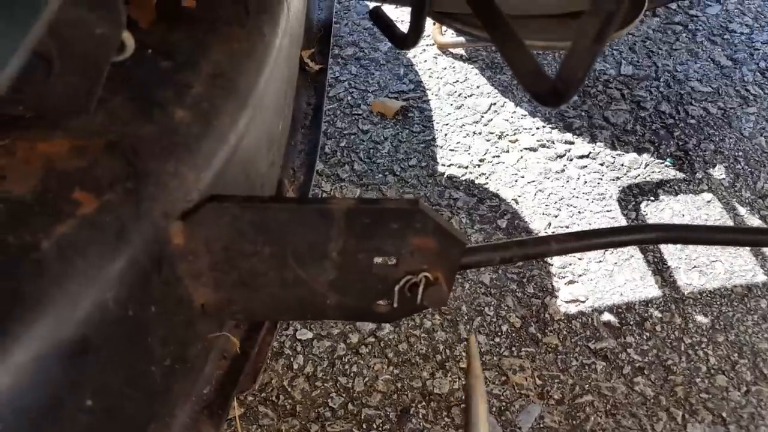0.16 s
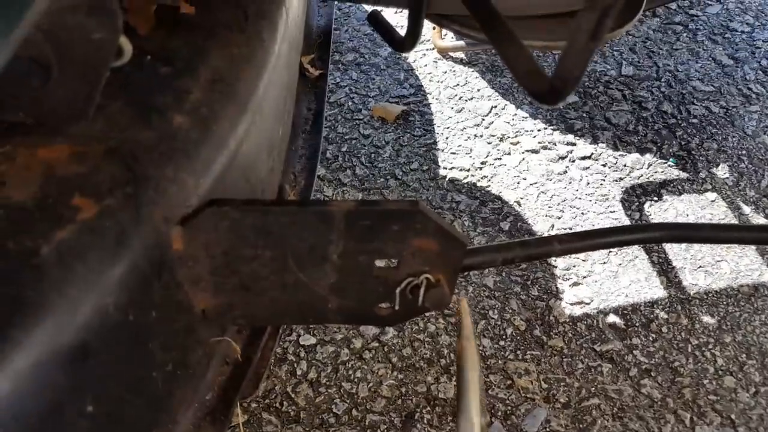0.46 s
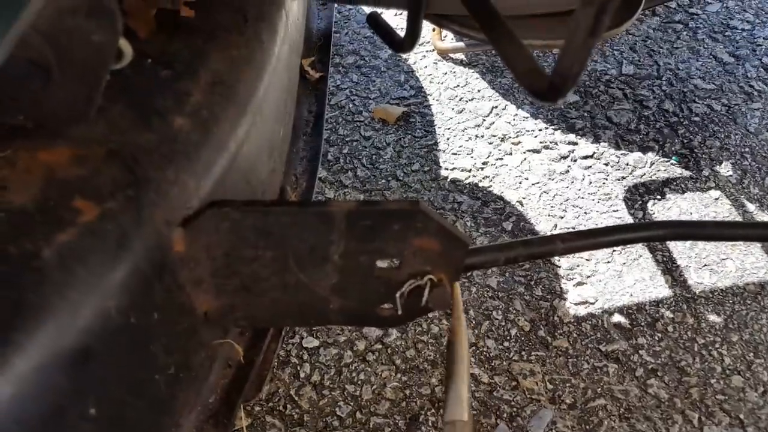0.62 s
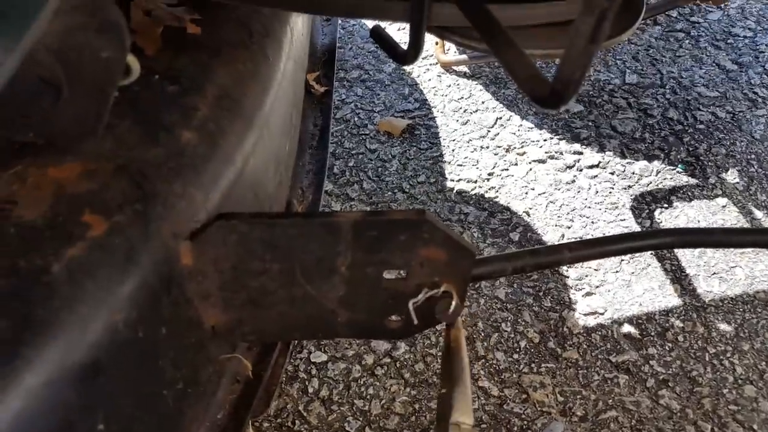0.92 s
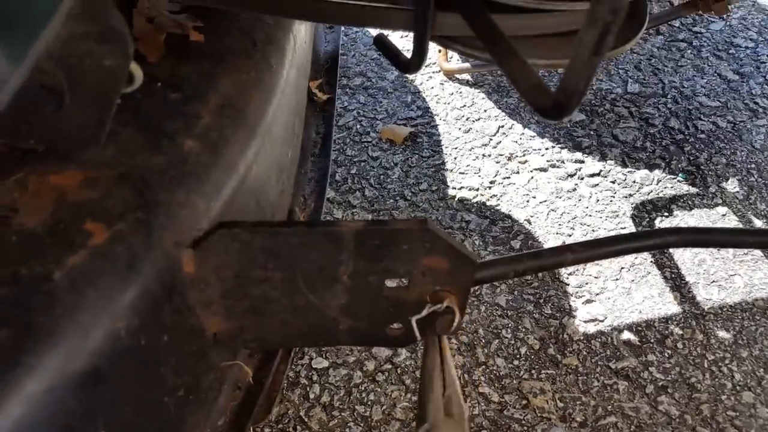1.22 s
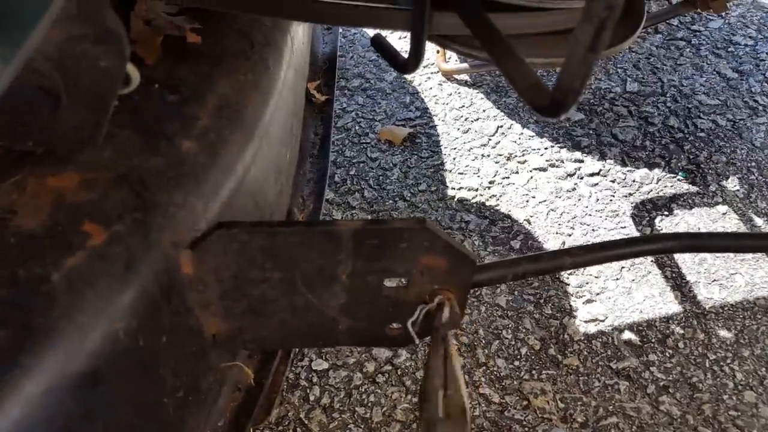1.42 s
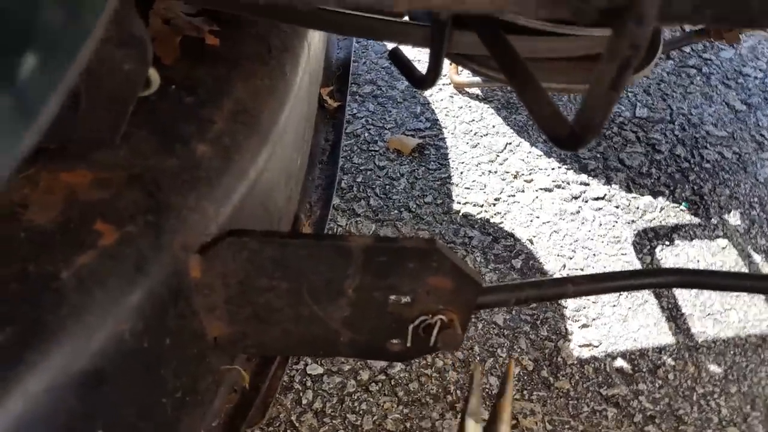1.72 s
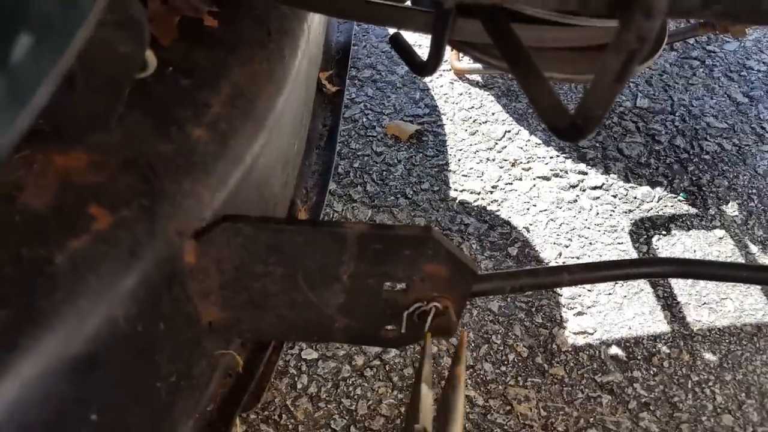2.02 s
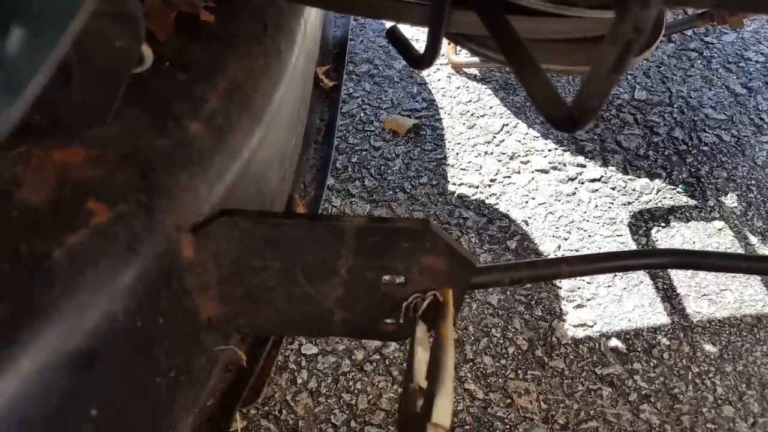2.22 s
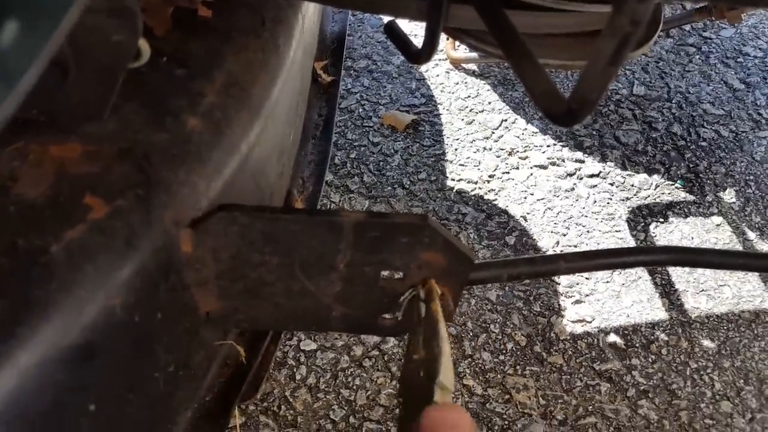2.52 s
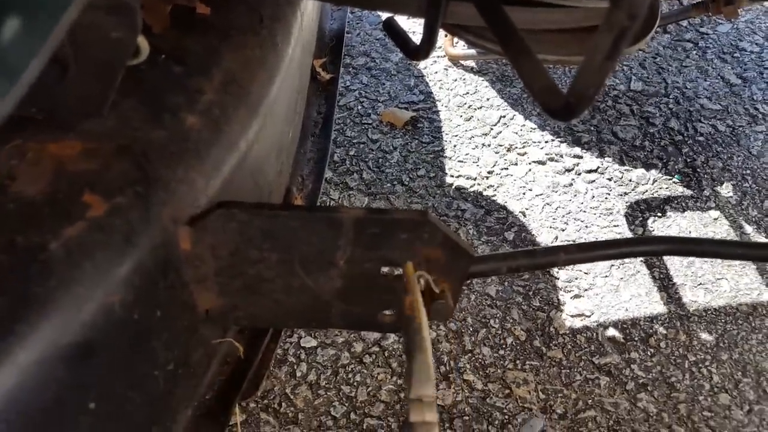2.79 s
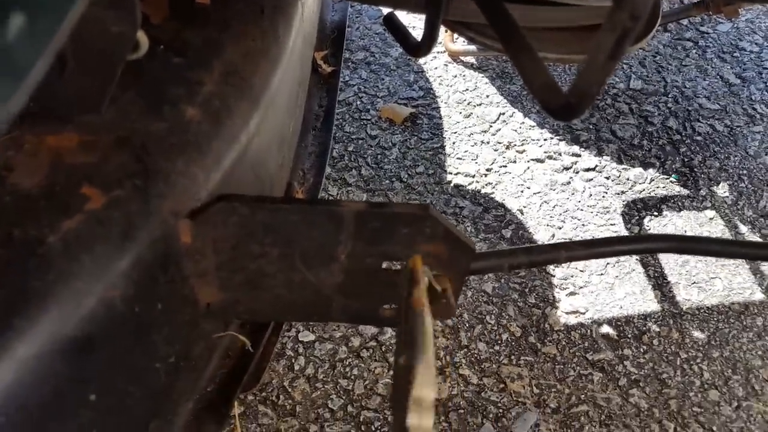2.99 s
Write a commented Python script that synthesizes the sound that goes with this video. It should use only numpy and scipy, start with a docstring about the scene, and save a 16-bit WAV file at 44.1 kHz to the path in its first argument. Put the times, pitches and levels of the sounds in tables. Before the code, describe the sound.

Needle-nose pliers click, scrape and knock on a wire clip in a steel bracket, close up.

```python
"""A distant engine's hum sinks outside an open garage while a small bird chirps; then close metal work begins.
Needle-nose pliers lever a wire clip in a steel bracket: each knock is a burst of noise bands and decaying sines.
Jaws and wire add light ticks, made the same way, and scrapes, made of dense grains of coloured noise.
The engine is a gliding stack of sines, the bird short fluttering tones, the air outside shaped noise."""
import sys
import numpy as np
from scipy import signal
from scipy.fft import rfft, irfft, next_fast_len
from scipy.io import wavfile

SR = 44100
rng = np.random.default_rng(int(sys.argv[2]) if len(sys.argv) > 2 else 0)


def generate_wav(sig):
    """Save sig (samples, or channels by samples) to the path in sys.argv[1] as 16-bit PCM at SR."""
    pcm = np.round(np.clip(np.atleast_2d(sig).T, -1, 1) * 32767).astype(np.int16)
    wavfile.write(sys.argv[1], SR, pcm)


N = 138915

BASS_HZ, BODY_HZ, BITE_HZ, TREBLE_HZ = 280, 856, 2470, 10100  # pitches that define a blow's colour
BANDS = 31.25 * 2 ** (np.arange(28) / 3)  # third-octave centres, Hz
RIGHT_LAG_S = 0.00016  # delay of common sound at the right microphone


def undb(db):
    """Decibels to gain."""
    return 10 ** (np.asarray(db) / 20)


def at(hz, table, axis=1):
    """Read one column of a table on a log-frequency axis."""
    table = np.array(table, float)
    return np.interp(np.log(np.maximum(hz, 1)), np.log(table[:, 0]), table[:, axis])


def fade(t, t60):
    """Exponential decay by 60 dB in t60 seconds."""
    return np.exp(-np.log(1000) * t / t60)


def pan(left_db):
    """Left and right gains of constant power, from the left's excess over the right in dB."""
    gains = undb(np.array([[left_db], [-left_db]]) / 2)
    return gains / np.sqrt(np.mean(gains ** 2))


def add(out, start, sound):
    """Mix a sound in at its start time in seconds."""
    i = max(int(start * SR), 0)
    out[:, i:i + sound.shape[1]] += sound[:, :max(N - i, 0)]


def contacts():
    """Knocks ring bracket and pliers, each grip favouring its own modes; light ticks ring the sheet and, of the
    clear modes, only the pliers'."""
    # knocks on the bracket: start_s, level_db, bass_db, bite_db and treble_db (against level_db), contact_s,
    # left_over_right_db, crack_db, favoured modes [(pitch_hz, level_db)];
    # crack and modes are against the blow's colour
    knocks = [(0.644,-33.5,-4.5,1.5,-13.5,0.0052,-2,-8,[(436,1.5),(781,-0.5),(2126,-5),(2374,-5),(2864,-9),(3435,0)]),
              (.665,-42.5,5.5,6,-21,0.02,-1,-3,[(1475,-3),(2500,-2),(2960,-2),(3510,-6)]),
              (.763,-39.5,4,-2,-12.5,0.0029,2.5,-3,[(6700,1)]),
              (0.8102,-38.5,-8,4,0.5,0.0031,-1,-1,[(781,2.5),(2121,-0.5),(2859,0.5),(3042,-2),(3440,-14)]),
              (.848,-46,-3,-6,-23,.011,-2,0,[(1470,-1),(3042,-9)]),
              (0.934,-34.5,-0.5,-3,-25.5,0.0011,0,3,[(441,2),(590,5),(711,-0.5),(1604,-1),(1841,2)]),
              (1.094,-28.5,-10,-18,-36,0.0051,-1.5,6,[(673,-5.5),(1023,-4.5),(1330,-2.5),(1642,-6)]),
              (1.533,-38.5,9,-0.5,-8,.0095,-1.5,-2,[(4304,0),(1855,-4),(8800,-14),(10352,-3)]),
              (1.553,-44.5,3,-2,-3.5,0.017,0,0,[(1093,7),(4350,-3)]),
              (2.296,-37,-4.5,-5,-9,.0064,0,14,[(678,1.5),(1174,-9),(3946,-2.5),(6605,-1.5),(8882,-8)]),
              (2.393,-25.5,-9.5,-4.5,-11.5,0.0011,-0.5,-13,[(1087,-3),(1860,-11),(2449,-8),(3951,-14),(7350,-4)]),
              (2.554,-17,-7,-3.5,-15,0.0026,-0.5,18.5,[(236,-3),(331,-3.5),(775,-5.5),(1114,-2.5),(1410,-2),(2159,-3.5)]),
              (2.621,-33,7,-4,-2,0.0015,-1.5,9,[(330,-1.5),(1017,0),(1863,0),(2970,6.5)]),
              (2.64,-40,-7,3,-22,.004,-1,3,[(2372,-8)]),
              (2.6846,-24.5,-7.5,-1,-4,0.0032,2.5,7,[(1174,-4),(1410,-7.5),(1841,-3),(3031,-5)]),
              (2.717,-25,1,-10,-24.5,.0032,-3,-4,[(6500,0),(8700,-5)]),
              (2.7648,-26.5,-2,7,-1.5,0.0018,0,12,[(2350,-6),(2885,-13.5),(8882,-5.5),(10508,-2)]),
              (2.771,-19,-10,-13,-13,0.0013,0.5,0,[(180,0),(262,2),(331,1),(598,-1),(711,-6)]),
              (2.794,-47,7.5,-24,-34,.0023,14,0,[(333,10),(366,2)]),
              (2.964,-35,0,-11.5,-34,0.0087,0,-6,[(5920,1)]),
              (2.9984,-24.5,-5,-3,-24,0.0038,-1.5,-2,[(1250,2),(1405,-6),(3870,-7),(2869,-4),(3034,-3)]),
              (3.025,-47.5,8,-22,-7,0.0049,2,0,[(1250,-9)]),
              (3.119,-38.5,-1,-8.5,-18.5,0.0077,0.5,-4,[(1900,2),(5650,-6)])]
    # light ticks of jaws on wire: start_s, level_db, left_over_right_db
    ticks = [(.6160, -43.5, -1), (0.7482, -46, -1), (1.6022, -42, -1.5), (1.6463, -51.5, 1),
             (2.167, -58.5, 1), (2.193, -68, 0), (2.228, -63, 3), (2.285, -49, 0), (2.448, -51.5, -1),
             (2.474, -53.5, 0), (2.547, -46, 0), (2.942, -49.5, 2), (3.065, -59, -2)]
    # modes of bracket and housing: pitch_hz, level_db, t60_s
    bracket = [(165.1, -15.5, 0.64), (246.7, -19, 0.057), (273.9, -10.5, 0.52), (327.9, -11.5, 0.37),
               (359.6, -14.5, 0.72), (597.5, -14, 0.41), (697, -19, 0.69), (745, -12, 0.34),
               (1087, -17, 0.18), (1153, -12.5, 0.22), (1375, -36, 0.42), (1814, -22.5, 0.51),
               (2240, -36.5, 0.55), (2383, -6, 0.1)]
    # modes of the pliers: pitch_hz, level_db, t60_s
    pliers = [(2780,-15.5,0.13),(3190,-53,0.091),(3670,-14,0.14),(6230,-4,.04),(8882,-21,0.12),(13100,-27,.05)]
    # colour of a tick, against its level: pitch_hz, level_db
    tick_colour = [(200, -27), (1200, -4.5), (3000, -6.5), (6500, -3), (14000, -10)]
    mode_scatter_db = 2.5
    grip_t60_s, grip_damping = 0.23, 0.4  # t60 at the body pitch; how fast it shortens upwards
    tick_contact_s, tick_crack_db = 0.0078, 6

    out = np.zeros((2, N))
    bands = band_noises()
    for start, db, bass, bite, treble, contact_s, left_db, crack_db, favoured in knocks:
        colour = [(BASS_HZ, db + bass), (BODY_HZ, db), (BITE_HZ, db + bite), (TREBLE_HZ, db + treble)]
        modes = [(hz, mode_db + mode_scatter_db * rng.standard_normal(), t60)
                 for hz, mode_db, t60 in bracket + pliers]
        modes += [(hz, mode_db, grip_t60_s * (BODY_HZ / hz) ** grip_damping) for hz, mode_db in favoured]
        modes += grip_modes()
        add(out, start, strike(bands, colour, contact_s, left_db, crack_db, modes))
    for start, db, left_db in ticks:
        colour = [(hz, db + tint) for hz, tint in tick_colour]
        add(out, start, strike(bands, colour, tick_contact_s, left_db, tick_crack_db, pliers))
    return out


def strike(bands, colour, contact_s, left_db, crack_db, modes):
    """One contact: a crack, the dense ring of the steel, its clear modes and the garage's tail."""
    # dense ring of the sheet metal: pitch_hz, level_db, t60_s, garage_tail_db, left_over_right_db
    sheet = [(74, -50, 0.21, 7, -13), (161.6, -2.5, 0.61, 1.5, 0.5), (402, -3, 0.35, -5.5, -1.5),
             (1000, -4, 0.14, -10, 1.5), (2100, -1.5, 0.14, -17, 6.5), (5400, -2.5, 0.057, -24, 3),
             (10500, 0.5, 0.031, -47, 3), (15200, -5.5, 0.042, -45, 0)]
    # reverberation of the garage: pitch_hz, t60_s
    garage = [(150, 0.63), (700, 0.73), (2500, 0.47), (6000, 0.11), (14000, 0.22)]
    crack_fall_s, room_build_s = 0.0013, 0.064  # time constants
    rise_cycles = 2.7  # time constant of the onset, in cycles of each pitch
    detune, phase_scatter = 0.003, 0.21  # share of pitch; cycles between the microphones

    t = np.arange(int(SR / 2)) / SR
    free = np.maximum(t - contact_s, 0)  # ring and tail decay only once the contact ends
    offset = rng.integers(N - len(t))  # a fresh stretch of noise for every strike
    out = np.zeros((2, len(t)))
    for hz, noise in zip(BANDS[2:], bands[2:]):
        ring = fade(free, at(hz, sheet, axis=2))
        crack = undb(crack_db) * np.exp(-t / crack_fall_s) * np.sqrt(hz / TREBLE_HZ)
        tail = undb(at(hz, sheet, axis=3)) * fade(free, at(hz, garage))
        tail = tail * (1 - np.exp(-t / room_build_s))
        rise = 1 - np.exp(-t * hz / rise_cycles)
        envelope = np.sqrt(ring ** 2 + crack ** 2 + tail ** 2) * rise
        sides = pan(left_db * min(hz / BODY_HZ, 1) + at(hz, sheet, axis=4))
        gain = undb(at(hz, colour) + at(hz, sheet))
        out += gain * sides * envelope * noise[:, offset:offset + len(t)]
    for hz, db, t60 in modes:
        pitch_chance, phase_chance, lag_chance, side_chance = rng.standard_normal(4)
        ringing = t[:int(t60 * SR)]
        treble_share = min(hz / BODY_HZ, 1)  # low pitches differ less between the sides
        lag = hz * RIGHT_LAG_S + phase_scatter * treble_share * lag_chance
        cycles = hz * (1 + detune * pitch_chance) * ringing + phase_chance - np.array([[0], [lag]])
        tone = np.sin((2 * np.pi * cycles).astype(np.float32))
        sides = pan(left_db * treble_share + at(hz, sheet, axis=4) + side_chance)
        envelope = fade(free[:len(ringing)], t60) * (1 - np.exp(-ringing * hz / rise_cycles))
        out[:, :len(ringing)] += undb(db + at(hz, colour)) * sides * tone * envelope
    end_fade = np.minimum(1, 10 * (t[-1] - t))
    return out * chatter(t) * end_fade


def grip_modes():
    """Many weak, sharp modes that shift with every new grip; the higher, the shorter."""
    count, level_db, scatter_db = 70, -18.5, 1.5
    t60_s, damping = 0.34, 0.71  # t60 at the body pitch; how fast it shortens upwards
    hz = np.geomspace(600, 15000, count) * (1 + 0.03 * rng.standard_normal(count))
    db = level_db + scatter_db * rng.standard_normal(count) + gap_db(hz)
    return list(zip(hz, db, t60_s * (BODY_HZ / hz) ** damping))


def gap_db(f):
    """Level of the steel's ring over pitch: it is mostly weaker in the gaps between its mode groups."""
    # gaps between the groups of sheet-metal modes: centre_hz, width_hz, level_db
    gaps = [(223, 29, -6), (600, 29, 0.5), (883, 150, -3), (1660, 70, -6.5), (2640, 84, -2.5),
            (4550, 250, -2.5)]
    return sum(db * np.exp(-((f - hz) / width) ** 2 / 2) for hz, width, db in gaps)


def band_noises():
    """Third-octave stereo noises of equal power, then shaped by the gaps between the mode groups."""
    f, spectrum = noise_spectrum()
    gap_gain = undb(gap_db(f))
    noises = []
    for hz in BANDS:
        mask = np.abs(np.log2((f + 1) / hz)) < 1 / 6
        noise = irfft(spectrum * gap_gain * mask)[:, :N]
        noises.append(noise / np.sqrt(mask.mean()) / 2)
    return noises


def noise_spectrum():
    """Stereo noise: alike in the bass, partly alike above, the common part a little late on the right."""
    shared, bass_shared, split_hz = 0.21, 0.98, 480  # shares common to both microphones
    size = 2 * next_fast_len(N // 2 + 1, real=True)
    f = np.fft.rfftfreq(size, 1 / SR)
    left, right, middle = rfft(rng.standard_normal((3, size)))
    share = np.clip(shared + (bass_shared - shared) / (1 + (f / split_hz) ** 2), 0, 1)
    common = middle * np.array([np.ones(len(f)), np.exp(-2j * np.pi * f * RIGHT_LAG_S)])
    return f, np.sqrt(share) * common + np.sqrt(1 - share) * np.array([left, right])


def coloured(table, per_octave=False):
    """Stereo noise of unit level whose colour is given per Hz, or per octave above 300 Hz."""
    f, spectrum = noise_spectrum()
    tilt = np.sqrt(np.maximum(f, 300)) if per_octave else 1
    noise = irfft(spectrum * undb(at(f, table)) / tilt)[:, :N]
    return noise / noise.std()


def chatter(t):
    """A quick uneven gain that settles: the judder of jaws, the flutter of a chirp."""
    depth_db, steps_per_s, settle_s = 3, 600, 0.02
    steps = rng.standard_normal(int(t[-1] * steps_per_s) + 2)
    wobble = np.interp(t * steps_per_s, np.arange(len(steps)), steps)
    return undb(depth_db * np.exp(-t / settle_s) * wobble)


def scrapes():
    """Serrated jaws catch and slip on the wire: dense uneven grains under a swell of pressure."""
    # jaws sliding on wire: start_s, length_s, level_db, brightness_db (gain above the split)
    slides = [(0.658, 0.15, -47, -19), (0.916, 0.061, -55, -0.5), (1.328, 0.12, -58.5, 3.5),
              (1.482, 0.13, -53.5, 2), (1.58, 0.1, -55, -3), (2.57, 0.05, -47, -4),
              (2.741, .04, -45.5, 4.5), (2.952, 0.1, -56, 6), (3.036, 0.12, -59, -1)]
    # colour of the rub: pitch_hz, level_db (per octave above 300 Hz)
    rub_colour = [(300, -34), (1200, 12.5), (3000, 12), (6000, 5), (10000, 6.5), (15000, 2)]
    grains_per_s, grain_scatter_db, grain_fall_s = 2400, 3, 0.002
    split_hz = 6500

    t = np.arange(N) / SR
    catches = (rng.random(N) < grains_per_s / SR) * undb(grain_scatter_db * rng.standard_normal(N))
    grains = signal.lfilter([1], [1, -np.exp(-1 / (grain_fall_s * SR))], catches)
    rub = grains / np.sqrt(np.mean(grains ** 2)) * coloured(rub_colour, per_octave=True)
    dull = signal.sosfiltfilt(signal.butter(2, split_hz, fs=SR, output="sos"), rub)
    bright = rub - dull
    out = np.zeros((2, N))
    for start, length, db, bright_db in slides:
        progress = np.clip((t - start) / length, 0, 1)
        pressure = np.sqrt(np.abs(np.sin(np.pi * progress)))
        out += undb(db) * pressure * (dull + undb(bright_db) * bright)
    return out


def engine():
    """A far engine's hum sinks as it slows: overtones of one falling pitch, wavering slightly."""
    # slowing of the engine: time_s, pitch_hz, level_db
    slowing = [(0.0, 103.1, -37.5), (0.11, 101.1, -44), (0.38, 101.2, -39.5), (0.46, 99.4, -46),
               (0.58, 94.4, -44), (0.69, 80.5, -59), (0.82, 74.1, -47), (1.06, 74.2, -52),
               (1.442, 67.1, -47), (1.68, 68.5, -46), (1.9, 58.08, -49.5), (2.3, 52.1, -53),
               (2.5, 48.9, -50), (2.6, 50.4, -69)]
    # its overtones, against the level above: multiple, level_db
    orders = [(1, 0.5), (1.5, -25), (2, -22), (3, -31), (4, -25.5)]
    pitch_waver, level_waver_db = 0.0028, 1.9
    t = np.arange(N) / SR
    times, hz, db = np.array(slowing).T

    def waver():
        return np.interp(t, np.linspace(0, t[-1], 70), rng.standard_normal(70))

    pitch = np.interp(t, times, hz) * (1 + pitch_waver * waver())
    phase = 2 * np.pi * np.cumsum(pitch) / SR
    hum = np.zeros(N)
    for multiple, order_db in orders:
        hum += np.sqrt(2) * undb(order_db + level_waver_db * waver()) * np.sin(multiple * phase)
    return undb(np.interp(t, times, db)) * hum


def bird():
    """Fluttering chirps that fall in pitch, and lower, level whistles."""
    # bird chirps: start_s, level_db
    chirps = [(0.059, -67), (0.187, -68), (0.312, -64.5), (.435, -65), (0.558, -63.5)]
    # faint far whistles: start_s, length_s, pitch_hz, level_db
    whistles = [(0,0.039,1800,-61.5),(.315,0.021,1750,-60.5)]
    chirp_s, top_hz, end_hz, fall_s = 0.029, 5150, 3350, 0.019  # falls from top towards end
    pitch_scatter = 0.013  # share of pitch, new for each chirp

    out = np.zeros((2, N))
    t = np.arange(int(chirp_s * SR)) / SR
    glide = end_hz + (top_hz - end_hz) * np.exp(-t / fall_s)
    for start, db in chirps:
        phase = 2 * np.pi * np.cumsum(glide * (1 + pitch_scatter * rng.standard_normal())) / SR
        swell = np.sin(np.pi * t / chirp_s)
        add(out, start, undb(db) * pan(0.25) * chatter(t) * swell * np.sin(phase))
    for start, length, hz, db in whistles:
        t = np.arange(int(length * SR)) / SR
        swell = np.sin(np.pi * t / length)
        add(out, start, undb(db) * pan(0) * chatter(t) * swell * np.sin(2 * np.pi * hz * t))
    return out


def outdoors():
    """Soft rumble and hiss through the open door: shaped noise under a slow level curve."""
    # colour of the outdoor air: pitch_hz, level_db (per Hz, relative)
    air_colour = [(15, -65), (25, -34), (43, -3.5), (59, -13), (82, 2), (301, -16.5), (641, -21.5),
                  (1100, -19), (1290, -26.5), (1520, -23.5), (7920, -48.5), (14800, -44), (16000, -39)]
    # level of the outdoor background: time_s, level_db
    air_level = [(0, -49), (.6, -49.5), (1.5, -50), (2.1, -51), (3.15, -44.5)]
    times, db = np.array(air_level).T
    return coloured(air_colour) * undb(np.interp(np.arange(N) / SR, times, db))


def scene():
    """The work on the wire over the sounds from outside."""
    return contacts() + scrapes() + engine() + bird() + outdoors()


def record(dry):
    """The recorder cuts the top: a steep low-pass."""
    top_hz = 15900
    return signal.sosfilt(signal.ellip(8, 0.2, 70, top_hz, fs=SR, output="sos"), dry)


dry = scene()
out = record(dry)
generate_wav(out)
```